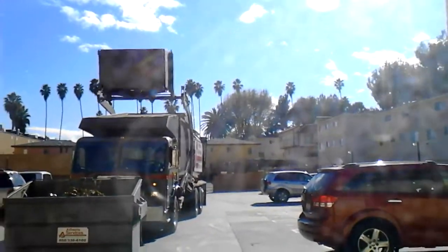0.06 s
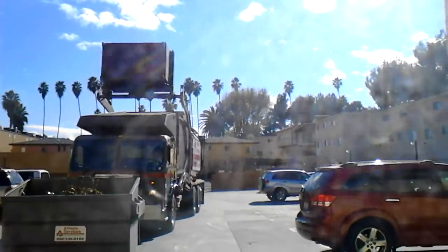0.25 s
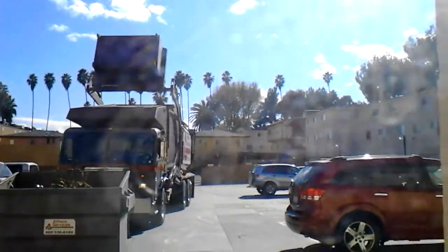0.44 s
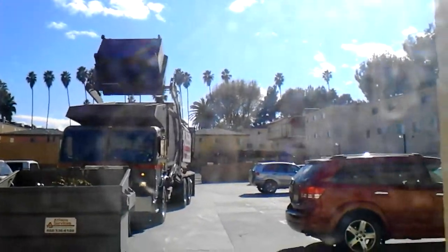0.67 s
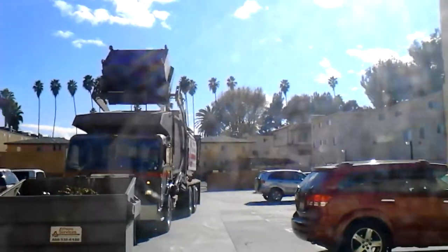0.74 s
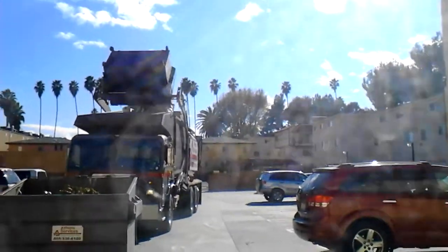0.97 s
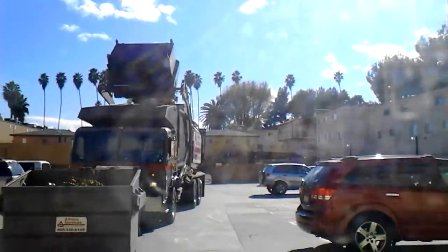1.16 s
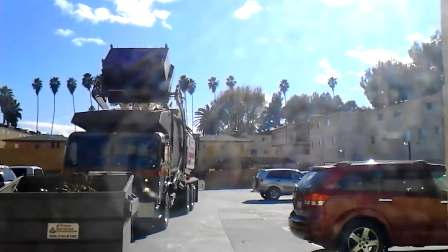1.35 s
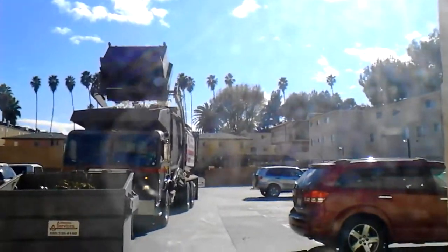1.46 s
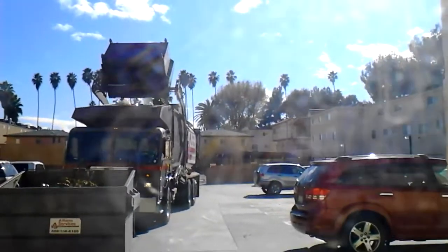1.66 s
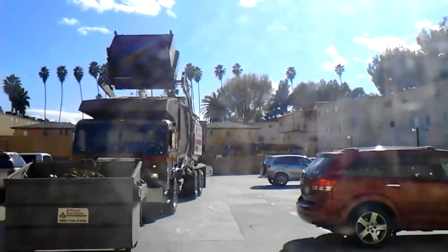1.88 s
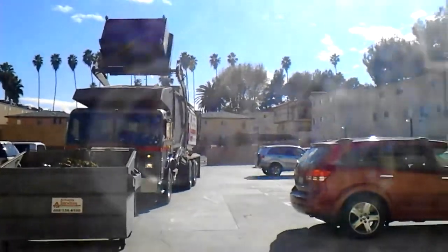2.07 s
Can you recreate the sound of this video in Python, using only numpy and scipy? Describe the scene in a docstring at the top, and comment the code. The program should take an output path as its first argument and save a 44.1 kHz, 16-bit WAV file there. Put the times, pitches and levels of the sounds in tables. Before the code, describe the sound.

Garbage truck tipping a steel bin: engine rumble, hydraulic whine, then clanging, thudding trash.

```python
"""A diesel drones and hydraulics whine and hiss: a front-loading garbage truck tips a dumpster.
The engine sags under the load of the arms, then picks up again. From about half a second on, rubbish
slides and clatters out of the steel bin and booms into the hopper, ringing its walls.
The buildings around the parking lot throw back the clatter and the machinery noise."""
import sys
import numpy as np
from scipy import signal
from scipy.fft import rfft, irfft
from scipy.io import wavfile
from scipy.ndimage import map_coordinates

SR = 44100
rng = np.random.default_rng(int(sys.argv[2]) if len(sys.argv) > 2 else 0)


def pcm_store(signal):
    """Save signal as 16-bit PCM."""
    levels = np.round(np.clip(np.atleast_2d(signal), -1, 1) * 32767)
    wavfile.write(sys.argv[1], SR, levels.astype(np.int16).T)


N = 93800
TIME_S = np.arange(N) / SR


def from_db(db):
    """Decibels to gain."""
    return 10 ** (np.asarray(db) / 20)


def unit_rms(x):
    """Scale to an rms of one."""
    return x / np.sqrt(np.mean(x ** 2) + 1e-20)


def curves(rows):
    """Each column after time_s, interpolated to every sample."""
    times_s, *columns = np.transpose(rows)
    return [np.interp(TIME_S, times_s, column) for column in columns]


def decay(age_s, t60_s):
    """Exponential fall, 60 dB in t60_s."""
    return np.exp(-np.log(1000) * age_s / t60_s)


def noise():
    """White noise."""
    return rng.standard_normal(N)


def drift(rate_hz):
    """Smooth random curve, spread about one."""
    return map_coordinates(rng.standard_normal(400), [TIME_S * rate_hz + 2], order=3, mode="wrap")


def convolve(x, response):
    """Apply an impulse response; white noise keeps its power."""
    return signal.fftconvolve(x, response / np.linalg.norm(response))[:N]


def colour(x, spectrum):
    """Minimum-phase filter; falls 12 dB per octave beyond the ends of the spectrum."""
    size = 8192
    hz, db = np.transpose(spectrum)
    log_hz = np.log(np.maximum(np.fft.rfftfreq(size, 1 / SR), 1))
    beyond = np.maximum(np.log(hz[0]) - log_hz, 0) + np.maximum(log_hz - np.log(hz[-1]), 0)
    cepstrum = irfft(np.interp(log_hz, np.log(hz), np.log(from_db(db))) - 2 * beyond)
    cepstrum[1:size // 2] *= 2
    cepstrum[size // 2 + 1:] = 0
    return convolve(x, irfft(np.exp(rfft(cepstrum))))


def resonate(x, modes):
    """Parallel damped resonances."""
    t = TIME_S[:SR // 4]
    response = sum(from_db(db) * width_hz * np.exp(-np.pi * width_hz * t) * np.cos(2 * np.pi * hz * t)
                   for hz, width_hz, db in modes)
    return convolve(x, response)


def contacts(rate_hz=2500, spread_db=2, power_share=0.64):
    """Dense small impacts of uneven size over scraping noise."""
    sizes = from_db(spread_db * np.minimum(rng.exponential(1, N), 4)) * rng.choice([-1, 1], N)
    impacts = unit_rms(sizes * (rng.random(N) < rate_hz / SR))
    return np.sqrt(power_share) * impacts + np.sqrt(1 - power_share) * noise()


# Building echoes: delay_s, gain_db
WALL_ECHOES = [(0.012, -14), (.029, -15), (0.049, -12.5), (0.082, -16.5)]

def parking_lot(x, tail_db):
    """Direct sound, wall echoes and a diffuse tail."""
    t = TIME_S[:SR]
    response = rng.standard_normal(SR) * decay(t, t60_s=0.77) * np.minimum(t / 0.024, 1)
    response *= from_db(tail_db) / np.linalg.norm(response)
    response[0] = 1
    for delay_s, db in WALL_ECHOES:
        response[int(delay_s * SR)] += from_db(db)
    return convolve(x, response)


# Pipe resonances: pitch_hz, width_hz, gain_db
PIPE_MODES = [(716, 9, 2), (835, 16, -9), (903, 12, -5), (1072, 20, -11)]
# Pump whine: time_s, level_db
WHINE_LEVEL = [(0, -36), (.16, -36), (.3, -39.5), (.42, -43), (1.65, -43.5), (2.13, -39)]

def pump():
    """The hydraulic pump whines in narrow pipe resonances, loudest at the start as the arms lift."""
    whine_db, = curves(WHINE_LEVEL)
    whine = resonate(noise(), PIPE_MODES)
    envelope = np.abs(signal.hilbert(whine)) + 1e-9
    return from_db(whine_db) * unit_rms(whine / np.sqrt(envelope))


# Engine speed: time_s, firing_hz
FIRING_RATE = [(0, 77.4), (.14, 80), (.3, 65), (.42, 54.4), (.52, 58.5), (.7, 57.6), (1.0, 55.4),
               (1.2, 58.7), (1.45, 49.5), (1.58, 49.2), (1.68, 49.5), (1.78, 53.4), (1.93, 59.5),
               (2.03, 59.5), (2.13, 62)]

def firing_phase():
    """One cycle per firing; the diesel slows under load and recovers in part."""
    firing_hz, = curves(FIRING_RATE)
    return 2 * np.pi * np.cumsum(firing_hz) / SR


# Running machinery: time_s, clatter_db, hiss_db
MACHINERY_LEVELS = [(0, -29.5, -38), (.15, -35, -41), (.35, -33, -43), (.52, -34, -42.5), (.9, -28.5, -42),
                    (1.5, -31, -43.5), (1.64, -33, -42), (1.8, -32, -41), (1.97, -33, -41),
                    (2.13, -32, -42)]
# Engine block spectrum: freq_hz, density_db
BLOCK_SPECTRUM = [(100, -12), (150, -0.5), (235, -4), (268, -15), (320, 0), (375, -3), (480, -0.5),
                  (545, -4), (595, -10), (650, -5), (720, -4.5), (880, -3.5), (970, -11), (1120, -9),
                  (1400, -24.5), (2100, -41), (4000, -51)]
# Block and body resonances: pitch_hz, width_hz, gain_db
BODY_MODES = [(301, 35, 9), (345, 17, -0.5), (447, 30, 6.5), (498.6, 17, 12), (702, 50, 4), (892.5, 11, 5),
              (1004, 27, 3.5)]
# Hydraulic hiss spectrum: freq_hz, density_db
HISS_SPECTRUM = [(900, -3.5), (1500, 1.5), (2200, -7), (2900, 1.5), (3400, -3), (4300, 1), (5250, 2),
                 (5800, -12.5), (7200, -13.5), (8200, -19)]

def machinery(firing):
    """Engine clatter and hydraulic hiss, both pulsed lightly by the firings."""
    clatter_db, hiss_db = curves(MACHINERY_LEVELS)
    pulse = unit_rms(np.exp(0.09 * (np.cos(firing) + 0.5 * np.cos(firing / 2))))
    block = from_db(-3) * colour(contacts() * pulse, BLOCK_SPECTRUM)
    body = from_db(-7) * resonate(noise() * pulse, BODY_MODES)
    hiss = colour(noise() * (1 + 0.028 * np.cos(firing)), HISS_SPECTRUM)
    return from_db(clatter_db) * (block + body) + from_db(hiss_db) * hiss


# Drone at the firing rate: time_s, level_db
DRONE_LEVEL = [(0, -40), (.22, -57), (.38, -51.5), (.5, -48), (.6, -36), (.68, -37), (.85, -30.5),
               (1.16, -30), (1.22, -62.5), (1.4, -41.5), (1.6, -40.5), (1.72, -35), (1.87, -27),
               (1.92, -35.5), (1.96, -48), (2.13, -52)]
# Engine load, the base level of rumble and overtones: time_s, level_db
LOAD_LEVEL = [(0, -45.5), (.5, -46.5), (.65, -40.5), (.85, -36.5), (1.1, -37.5), (1.3, -31), (1.45, -38),
              (1.75, -38), (1.95, -42), (2.13, -40.5)]
# Exhaust overtones: firing_multiple, gain_db
EXHAUST_OVERTONES = [(2, -2), (3, -9.5), (4, -31), (5, -11.5)]
# Low rumble spectrum: freq_hz, density_db
RUMBLE_SPECTRUM = [(35, -29), (52, -3.5), (78, -1), (120, 0), (160, -6.5), (210, -7.5), (270, -8),
                   (600, -35)]

def exhaust(firing):
    """Firings drive a wavering drone; its overtones and the rumble follow the load."""
    drone_db, = curves(DRONE_LEVEL)
    load_db, = curves(LOAD_LEVEL)
    drone = from_db(drone_db + 2 * drift(16)) * np.sin(firing)
    overtones = sum(from_db(load_db + db) * np.sin(multiple * firing + 1.01 * drift(9.44))
                    for multiple, db in EXHAUST_OVERTONES)
    rumble = from_db(load_db + 1) * unit_rms(colour(noise(), RUMBLE_SPECTRUM))
    return np.sqrt(2) * (drone + overtones) + rumble


# Sharp taps: start_s, level_db
TAP_HITS = [(.537, -34), (.65, -29.5), (.683, -33.5), (.952, -33.5), (1.135, -40), (1.199, -32.5),
            (1.238, -35), (2.087, -31)]
# Tap spectrum: freq_hz, density_db
TAP_SPECTRUM = [(2000, -10), (3700, 2), (5200, 3), (6200, -12), (8000, -14)]

def taps(decay_s=0.012):
    """Small hard pieces hit the steel: bright cracks with an instant onset."""
    envelope = sum(from_db(db) * (TIME_S >= start_s) * np.exp(-np.maximum(TIME_S - start_s, 0) / decay_s)
                   for start_s, db in TAP_HITS)
    return colour(contacts() * envelope, TAP_SPECTRUM)


# Loose metal: start_s, lower_hz, upper_hz, level_db
CLINK_HITS = [(0.573, 1063, 1192, -28.5), (.612, 838, 904, -26), (0.61, 3300, 4930, -29),
              (.624, 4500, 4580, -29), (0.637, 760, 1084, -26.5), (.649, 4510, 5000, -26.5),
              (.76, 812, 1127, -22), (.772, 2573, 3630, -27.5), (.774, 560, 713, -23),
              (.812, 722, 827, -25), (.932, 830, 1096, -27.5), (1.045, 3620, 4920, -31.5),
              (1.056, 1100, 1115, -24), (1.197, 1920, 4520, -26.5), (1.251, 4120, 4600, -36),
              (1.288, 2550, 5160, -37), (1.742, 844, 899, -26), (1.78, 767, 1084, -32),
              (2.088, 3760, 4910, -31)]

def clinks(rise_s=0.002):
    """Each loose metal piece rings with two partials; higher ones die sooner."""
    ringing = 0
    for start_s, *partials_hz, db in CLINK_HITS:
        age_s = np.maximum(TIME_S - start_s, 0)
        strike = from_db(db) * (1 - np.exp(-age_s / rise_s))
        for hz in partials_hz:
            t60_s = 0.12 * (1000 / hz) ** 0.35
            ringing += strike * decay(age_s, t60_s) * np.sin(2 * np.pi * hz * age_s)
    flutter = 1 + 0.086 * drift(250)
    return ringing * flutter


# Rubbish striking steel: start_s, thud_db, clang_db, rattle_db, decay_s
RUBBISH_KNOCKS = [(0.533, -34, -31, -35, 0.056), (0.569, -31, -24.5, -37.5, 0.18),
                  (0.616, -26.5, -23.5, -36, 0.036), (.649, -55, -26, -28, 0.0047),
                  (.684, -50, -40.5, -35.5, 0.062), (.758, -22.5, -19.5, -31.5, 0.036),
                  (0.779, -16.5, -20, -30.5, 0.053), (0.817, -28, -23, -41, 0.058),
                  (.885, -23, -30, -52, 0.06), (.998, -18, -44, -59, .02),
                  (1.032, -29, -24.5, -32.5, 0.047), (1.061, -21.5, -22.5, -31, 0.016),
                  (1.117, -19, -33, -42, 0.12), (1.163, -29, -24.5, -50, 0.056),
                  (1.197, -13.5, -24, -33, 0.021), (1.234, -13, -24.5, -36, 0.08),
                  (1.288, -17.5, -22, -33.5, 0.023), (1.343, -16, -30, -51, 0.077),
                  (1.399, -16.5, -44, -41.5, 0.044), (1.445, -23, -49, -43, 0.073),
                  (1.568, -20.5, -49, -57, 0.071), (1.682, -22, -31, -36, 0.071),
                  (1.747, -36, -32, -49, .016), (1.791, -21, -43, -52.5, 0.019),
                  (2.09, -51, -28.5, -34, 0.025)]

def knock_envelopes(attack_s=0.0059):
    """Thud, clang and rattle envelopes: knocks rise fast, die exponentially and add in power."""
    power = np.zeros((3, N))
    for start_s, *levels_db, decay_s in RUBBISH_KNOCKS:
        age_s = np.maximum(TIME_S - start_s, 0)
        burst = np.minimum(age_s / attack_s, 1) * np.exp(-np.maximum(age_s - attack_s, 0) / decay_s)
        power += np.outer(from_db(levels_db), burst) ** 2
    return np.sqrt(power)


# Bin panel resonances: pitch_hz, width_hz, gain_db
PANEL_MODES = [(633, 7.8, -9), (703, 30, 1.5), (778, 36, 7), (821, 76, 6), (900, 35, 2.5), (1036, 37, 4.5),
               (1082, 51, 3), (1185, 22, 1.5), (1382, 77, -6.5)]
# Bright rattle spectrum: freq_hz, density_db
RATTLE_SPECTRUM = [(900, 15), (1500, -3.5), (2000, 8), (2900, -3.5), (3300, 7.5), (4300, 10.5), (5200, 1),
                   (5900, -16), (7200, -35), (8200, -37)]
# Small metal part resonances: pitch_hz, width_hz, gain_db
FITTING_MODES = [(1973, 29, 5), (2540, 13, 11), (2990, 25, 12), (3324, 23, 4.5), (3810, 28, -1),
                 (4100, 42, -4.5), (4580, 42, 6.5), (4995, 67, 11), (5180, 120, 1.5)]

def dumpster(clang_envelope, rattle_envelope):
    """Bursts of contacts clang the bin's panels and rattle its fittings."""
    clang = from_db(-5) * resonate(contacts() * clang_envelope, PANEL_MODES)
    rattle = from_db(-2) * colour(contacts() * rattle_envelope, RATTLE_SPECTRUM)
    fittings = from_db(-3.5) * resonate(contacts() * rattle_envelope, FITTING_MODES)
    return clang + rattle + fittings


# Hopper wall modes: pitch_hz, gain_db, t60_s
HOPPER_MODES = [(220, -9, .4), (249, -1, .5), (285, -1, .65), (323, -4, .45), (353, 0, .8),
                (367, -3.5, .38), (388, -10, .3), (415, -12, .3), (451, -4, .4), (486, 0, .55),
                (510, -5, .35), (544, -9, .35)]
# Heavy pieces landing: start_s, level_db, centre_hz, spread_octaves
HEAVY_FALLS = [(.752, -26.5, 328, .3), (1.108, -25, 348.9, .12), (1.181, -22, 500.6, 0.22),
               (1.219, -21, 320, 0.32), (1.28, -24, 276, 0.13), (1.295, -23.5, 480, 0.092),
               (1.37, -20.5, 352, .12)]

def hopper(thud_envelope, rise_s=0.0059, waver_db=1.3, damped_width_hz=14):
    """Heavy pieces ring the wall modes near their own pitch; light rubbish damps the modes and thuds."""
    ringing = 0
    for hz, mode_db, t60_s in HOPPER_MODES:
        power = 0
        for start_s, fall_db, centre_hz, spread_octaves in HEAVY_FALLS:
            age_s = np.maximum(TIME_S - start_s, 0)
            coupling = np.exp(-0.5 * (np.log2(hz / centre_hz) / spread_octaves) ** 2)
            envelope = (1 - np.exp(-age_s / rise_s)) * decay(age_s, t60_s)
            power += (from_db(fall_db + mode_db) * coupling * envelope) ** 2
        waver = from_db(waver_db * drift(44.32))
        phase = 2 * np.pi * (hz * TIME_S + rng.random()) + 0.22 * drift(14)
        ringing += np.sqrt(power) * waver * np.sin(phase)
    damped_modes = [(hz, damped_width_hz, 0.45 * db) for hz, db, _ in HOPPER_MODES]  # gains evened out
    thuds = resonate(contacts() * thud_envelope, damped_modes)
    thuds = signal.sosfilt(signal.butter(2, [230, 560], "band", fs=SR, output="sos"), thuds)
    return from_db(0.5) * ringing + from_db(-6) * thuds


def scene():
    """The truck and its falling load, in mono; exhaust and hopper arrive without echoes."""
    firing = firing_phase()
    thud, clang, rattle = knock_envelopes()
    direct = exhaust(firing) + hopper(thud)
    truck_and_bin = parking_lot(machinery(firing) + pump() + dumpster(clang, rattle), tail_db=-8.5)
    small_pieces = parking_lot(clinks() + taps(), tail_db=-16.5)  # high in the bin, they stir the lot less
    return (direct + truck_and_bin + small_pieces)[None]


def record(dry):
    """The microphone drops the deepest bass and rolls off the treble; the top is cut."""
    bass_cut = signal.butter(3, 34, "high", fs=SR, output="sos")
    treble_rolloff = signal.butter(9, 6700, fs=SR, output="sos")
    top_cut = signal.cheby2(18, 50, 9200, fs=SR, output="sos")
    return signal.sosfilt(np.vstack([bass_cut, treble_rolloff, top_cut]), dry)


dry = scene()
out = record(dry)
pcm_store(out)
```